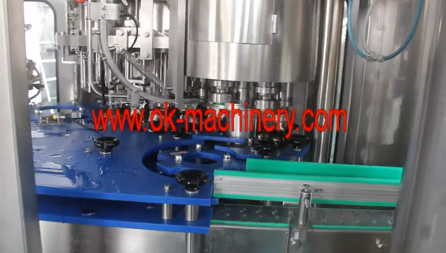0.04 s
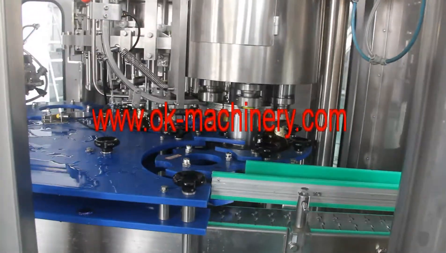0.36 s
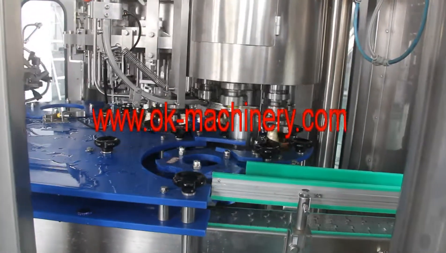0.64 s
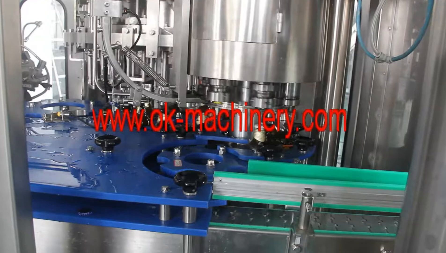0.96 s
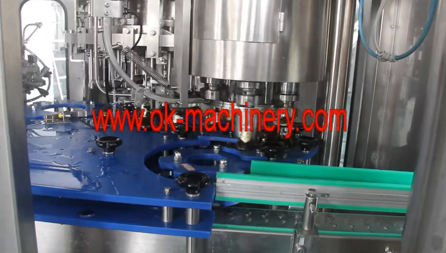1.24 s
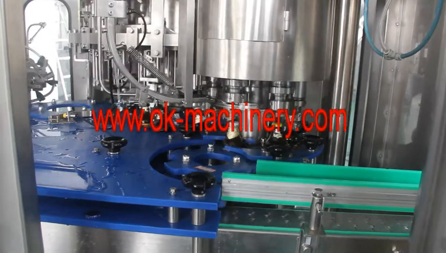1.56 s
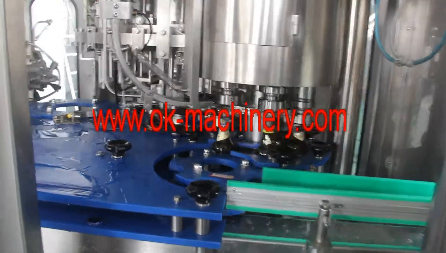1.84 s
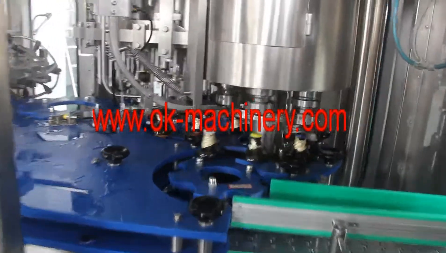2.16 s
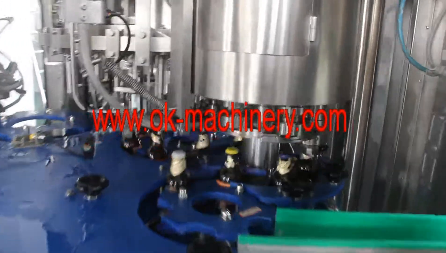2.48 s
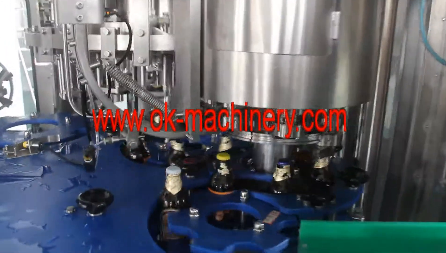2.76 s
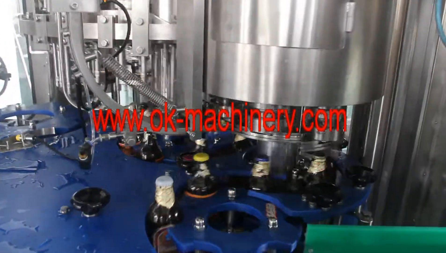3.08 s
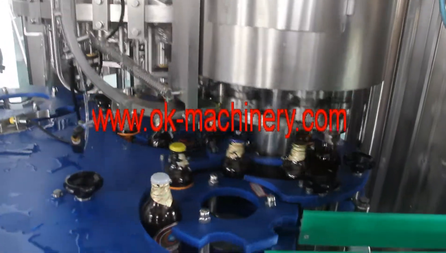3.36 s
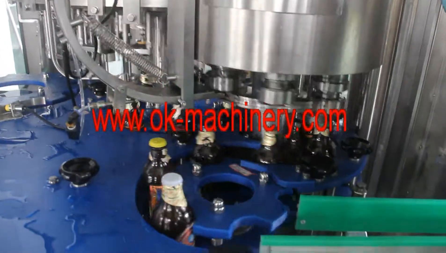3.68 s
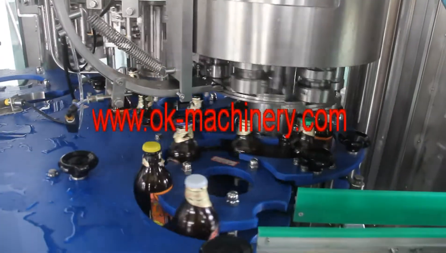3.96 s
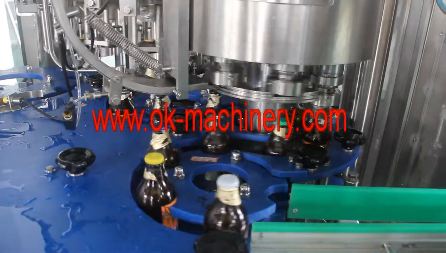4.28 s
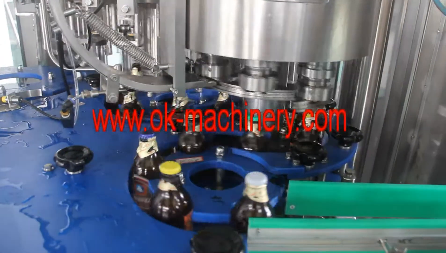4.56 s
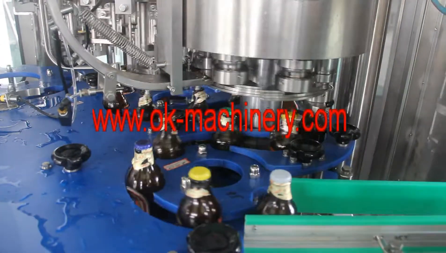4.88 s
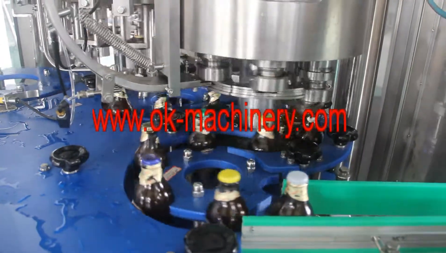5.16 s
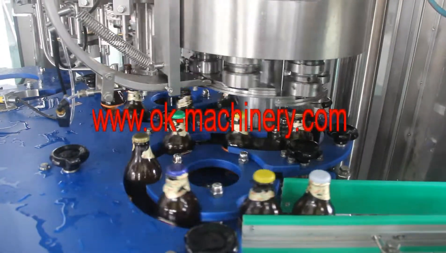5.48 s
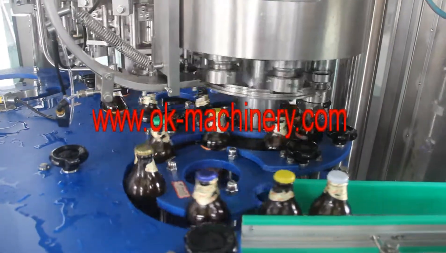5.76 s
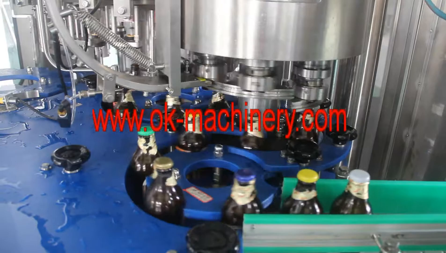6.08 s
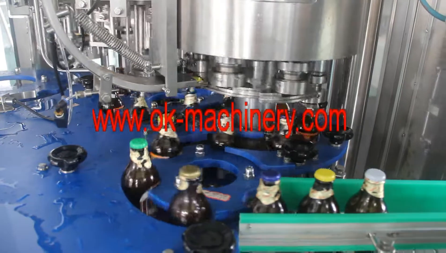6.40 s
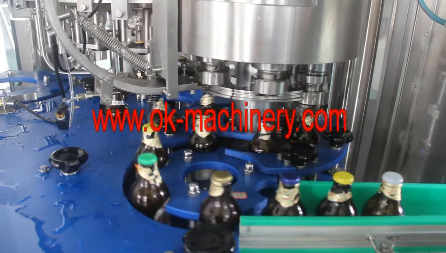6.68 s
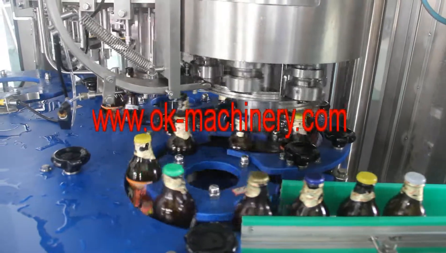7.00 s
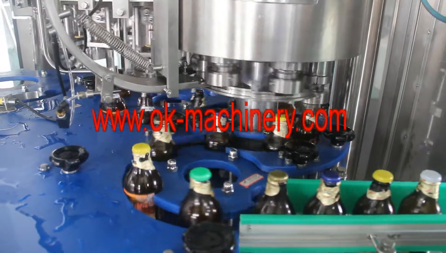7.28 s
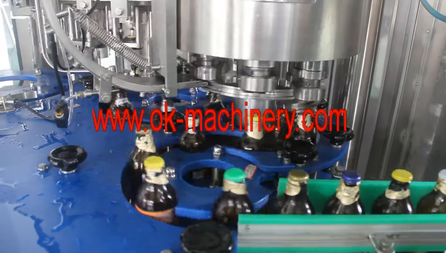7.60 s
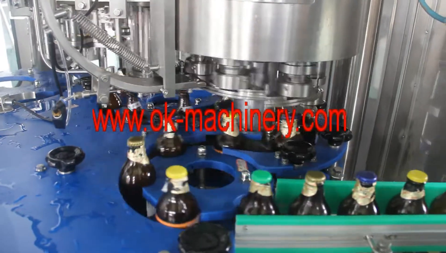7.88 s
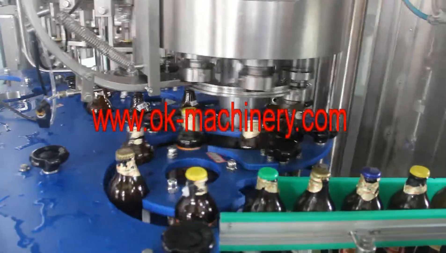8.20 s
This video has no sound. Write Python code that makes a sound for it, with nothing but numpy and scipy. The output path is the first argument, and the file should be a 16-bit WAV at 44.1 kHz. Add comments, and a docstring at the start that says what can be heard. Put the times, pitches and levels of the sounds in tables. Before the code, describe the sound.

A jet of compressed air hisses without pause inside a bottle capping machine, ringing between steel guards. A little more than once a second a passing bottle adds a brief fizz and airy, whistling surges. Conveyors roar and the drive rumbles underneath, with a few dull bumps. After about two seconds the hand-held microphone moves in through the guard door, and everything becomes louder and fuller.

```python
"""A compressed-air jet hisses without pause, 1.2 m from the microphone, inside a rotary bottle capper.
It rings the hollows between capping heads and bottles, and the steel guards echo it. Every 0.8 s a bottle
crosses the jet: a fizz, then the hollows surge in turn. Underneath, conveyors roar and the drive rumbles.
The hand-held microphone is carried up to the open guard door and leans in at 2.4 s, ending 0.75 m away."""
import sys
import numpy as np
from scipy import signal
from scipy.fft import rfft, irfft, next_fast_len
from scipy.io import wavfile
from scipy.ndimage import uniform_filter1d, minimum_filter1d, map_coordinates

SR = 44100
rng = np.random.default_rng(int(sys.argv[2]) if len(sys.argv) > 2 else 0)


def generate_wav(sig):
    """Save sig (samples, or channels by samples) to the path in sys.argv[1] as 16-bit PCM at SR."""
    pcm = np.round(np.clip(np.atleast_2d(sig).T, -1, 1) * 32767).astype(np.int16)
    wavfile.write(sys.argv[1], SR, pcm)


N = 367794
T = np.arange(N) / SR


def undb(db):
    """Decibels to gain."""
    return 10 ** (np.asarray(db) / 20)


def unit(x):
    """Scale to rms 1."""
    return x / np.std(x)


def noise(gain):
    """Turbulence of rms 1 whose spectrum is gain(Hz)."""
    size = next_fast_len(N)
    hz = np.maximum(np.arange(size // 2 + 1) * SR / size, 1)
    spectrum = rfft(rng.standard_normal(size)) * gain(hz)
    return unit(irfft(spectrum, size)[:N])


def coloured(points):
    """Turbulence with a spectrum of (Hz, dB) points."""
    corner_hz, db = np.transpose(points)
    return noise(lambda hz: undb(np.interp(np.log(hz), np.log(corner_hz), db)))


def bell(hz, centre_hz, width_hz):
    """Gain of a resonance with steep skirts."""
    return 1 / (1 + ((hz - centre_hz) / (.78 * width_hz)) ** 2)


def blown(centre_hz, width_hz):
    """A resonance driven by turbulence; its centre may move."""
    phase = 2 * np.pi * np.cumsum(centre_hz * np.ones(N)) / SR
    a, b = (noise(lambda hz: bell(hz, 0, width_hz)) for _ in range(2))
    return unit(a * np.cos(phase) + b * np.sin(phase))


def wander(rate_hz):
    """Random drift of spread 1, changing about rate_hz times a second."""
    return noise(lambda hz: 1 / (1 + (hz / rate_hz) ** 4))


def swell(at_s, spread_s):
    """A Gaussian rise and fall round one moment."""
    return np.exp(-.5 * ((T - at_s) / spread_s) ** 2)


def delayed(x, lag_s):
    """The sound after a delay that may move."""
    return map_coordinates(x, [np.arange(N) - lag_s * SR], order=2, mode="mirror")


# The microphone's way in. Each row: time in seconds, place (0 outside the guards, 1 in the doorway,
# 2 inside), distance from the jet in metres.
MIC_PATH = [(0, 0.12, 1.2), (1.2, 0.15, 1.1), (1.6, .06, 1), (2, 0.13, 0.89), (2.365, 0.11, .89),
            (2.385, 1.05, 0.784), (2.8, 1, 0.84), (3.3, 1.69, .73), (4.1, 1.92, 0.74), (8.34, 2.08, 0.75)]

def mic_place():
    """Where the microphone is at each moment, from outside to inside."""
    times, places, _ = np.transpose(MIC_PATH)
    return np.interp(T, times, places)


def by_place(db):
    """Gain at the microphone, given levels outside, in the doorway and inside."""
    return undb(np.interp(mic_place(), [0, 1, 2], db))


def by_distance():
    """The jet's sound falls off as one over the distance in metres."""
    times, _, metres = np.transpose(MIC_PATH)
    return 1 / np.interp(T, times, metres)


# The jet's direct hiss. Each row: frequency in Hz, relative level in dB.
JET_SPECTRUM = [(500, -30), (1100, -11.5), (1500, -5.5), (2050, -5), (2500, -8), (3200, 3.5), (4000, -0.5),
                (4800, 4.5), (6400, 2), (7000, 1), (9300, -2), (11300, -4.5), (12600, -9.5), (15500, -12.5)]

def jet(hiss_db=-17.0):
    """The free jet hisses broadly and flutters a little."""
    flutter_db = .25 * wander(9)
    return coloured(JET_SPECTRUM) * undb(hiss_db + flutter_db)


# One bottle crosses the jet at each step of the star wheel. Each row: time in seconds, then in dB the
# hollow's surge behind this bottle, its surge ahead of the next, and the neck's change in level.
CROSSINGS = [(0, 1.5, -7, 0), (0.786, -1, 0, 4), (1.572, 3.5, 1.5, -5), (2.36, 1, -1, -5), (3.148, 4, 3, 8),
             (3.93, 2, 3, 8), (4.715, 3.5, 3, 9.5), (5.502, 5, 6, 0), (6.285, 5, 4.5, 5),
             (7.068, 5, 3.5, 4), (7.862, 5, 5, 5)]

def each_bottle(after_s, spread_s, column=None):
    """One swell at the same point of every cycle; a column of the crossings may give its size."""
    return sum((row[column] if column else 1) * swell(row[0] + after_s, spread_s) for row in CROSSINGS)


def choke_db(block_db=-3, lead_s=0.046, spread_s=0.046, head_share=0.18, head_after_s=0.42):
    """Each arriving bottle partly blocks the jet; so, less, does the capping head half a cycle later."""
    return block_db * (each_bottle(-lead_s, spread_s) + head_share * each_bottle(head_after_s, spread_s))


def spray(level_db=-25, spread_s=0.034, centre_hz=9000, width_hz=3800):
    """Each wet bottle splits the jet into a short, brighter fizz."""
    return blown(centre_hz, width_hz) * undb(level_db) * each_bottle(0, spread_s)


# The hollow under the capping heads: level in dB at 1 m, from outside, the doorway and inside.
HOLLOW_LEVELS = [-25, -18, -24.5]

def hollow(doorway_hz=3640, inside_hz=3560, bend_hz=70, behind_s=.18, ahead_s=.53, spread_s=.08):
    """The jet rings the hollow in two surges a cycle: higher behind a bottle, lower ahead of the next."""
    bend = bend_hz * (each_bottle(behind_s, spread_s) - each_bottle(ahead_s, spread_s))
    centre_hz = np.interp(mic_place(), [1, 2], [doorway_hz, inside_hz]) + bend + 55 * wander(7)
    surge_db = each_bottle(behind_s, spread_s, column=1) + each_bottle(ahead_s, spread_s, column=2)
    ring = blown(centre_hz, width_hz=520) * by_place(HOLLOW_LEVELS)
    return ring * undb(surge_db + choke_db() + 0.95 * wander(6.3))


# The echo off the machine's table: dB against the direct sound, outside, in the doorway and inside.
TABLE_ECHO_LEVELS = [-16, -20, -33]

def echoes(air, echo_share=0.13, count=14, detour_at_1m_ms=0.2496):
    """A glancing echo off the table and later ones off guards and heads comb the hiss; the combs slide."""
    detour_s = detour_at_1m_ms * by_distance() / 1000
    combed = air + by_place(TABLE_ECHO_LEVELS) * delayed(air, detour_s)
    for lag_s in np.geomspace(.001, .016, count):
        # each path changes as the microphone moves in, and wavers with the turning parts
        path_s = lag_s * rng.uniform(.9, 1.1) + rng.uniform(-3, 3) * detour_s
        combed += echo_share * delayed(air, path_s + .00005 * wander(3.5))
    return unit(combed) * np.std(air)


# The air space between the guards: overall level in dB outside, in the doorway and inside.
CABINET_LEVELS = [-23.5, -15, -19]
# Its modes. Each row: pitch in Hz, width in Hz, relative dB outside, in the doorway and inside.
AIR_MODES = [(1400, 210, -13, -23.5, -25.5), (1930, 430, -18, -11.5, -18), (2210, 95, -1.5, -9, -2.5),
             (2368, 46, -14, -1, 0), (2501, 47, -2, 0, 2.5), (2684, 102, -15, -0.5, 0.5),
             (2920, 190, -1, -15, 0.5), (3123, 110, 5, -3, -3.5), (3446, 120, -16, -2.5, 0),
             (3745, 89, 4, -8.5, 1), (3970, 52, 9.5, 4, -6), (4140, 50, 7, -3.5, -16),
             (4396, 93, 7, -2, -10), (4890, 103, -3, -5.5, -1.5), (5340, 200, -1, -5, -2.5),
             (5560, 24, -6, -1.5, 4), (6280, 140, 1, -39, -5.5), (6500, 89, 0.5, -2.5, -18)]

def cabinet(choke_share=0.38):
    """The hiss keeps the air between the guards ringing; each mode is strong here and weak there."""
    ring = 0
    for place, level_db in enumerate(CABINET_LEVELS):
        def spectrum(hz):
            gains = (undb(db[place]) * bell(hz, pitch, width) for pitch, width, *db in AIR_MODES)
            return np.sqrt(sum(gain ** 2 for gain in gains))
        nearness = np.maximum(1 - abs(mic_place() - place), 0)
        ring += noise(spectrum) * np.sqrt(nearness) * undb(level_db)
    return ring * undb(choke_share * choke_db())


# The conveyors in the hall. Each row: frequency in Hz, relative level in dB.
CONVEYOR_SPECTRUM = [(80, -40), (200, 0), (350, 2), (800, 3), (1300, 0), (1800, 0), (2100, -24),
                     (4000, -16)]
# Their level in dB before the trim: outside, in the doorway and inside.
CONVEYOR_LEVELS = [-44, -35, -35]

def conveyors(trim_db=1.42):
    """The conveyors' roar jumps up as the microphone clears the door frame."""
    return coloured(CONVEYOR_SPECTRUM) * by_place(CONVEYOR_LEVELS) * undb(trim_db + 0.97 * wander(13.4))


# The capper's drive. Each row: frequency in Hz, relative level in dB.
DRIVE_SPECTRUM = [(20, -35), (42, -32), (70, -23), (90, 0), (130, -0.5), (185, -3.5), (270, -7), (500, -22),
                  (1500, -23.5)]
# Its rumble in dB: outside, in the doorway and inside.
DRIVE_LEVELS = [-47.5, -44, -43.5]

def drive(hum_hz=179, hum_db=-54.5):
    """The drive rumbles, louder from the doorway on, with a faint hum that is alike everywhere."""
    rumble = coloured(DRIVE_SPECTRUM) * by_place(DRIVE_LEVELS) * undb(.9 * wander(8.1))
    return rumble + blown(hum_hz, width_hz=18.0) * undb(hum_db)


# Edges in the jet. Each row: seconds after a crossing, spread in seconds, pitch in Hz, width in Hz,
# level in dB at 1 m.
EDGE_WHISTLES = [(.155, 0.037, 4520, 450, -31), (0.437, 0.067, 6540, 450, -34),
                 (.63, 0.038, 4316, 500, -26.5)]

def edges(flutter_db=2.0):
    """Edges of the turning head cut the jet: three airy whistles in every cycle."""
    return sum(blown(hz, width) * each_bottle(after, spread) * undb(db + flutter_db * wander(3))
               for after, spread, hz, width, db in EDGE_WHISTLES)


# The gap round a bottle neck: level in dB at 1 m, from outside, the doorway and inside.
NECK_LEVELS = [-24, -37, -28.5]

def neck(centre_hz=5620, after_s=.27, glide_hz_per_s=3500):
    """The gap round a neck sings, mostly louder just after a crossing, rising in pitch as it narrows."""
    times = np.array(CROSSINGS)[:, 0]
    since_crossing_s = T - times[np.maximum(np.searchsorted(times, T) - 1, 0)]
    glide_hz = glide_hz_per_s * (since_crossing_s - after_s) * each_bottle(after_s, spread_s=.1)
    surge_db = each_bottle(after_s, spread_s=0.056, column=3)
    ring = blown(centre_hz + glide_hz + 70 * wander(9), width_hz=540)
    return ring * by_place(NECK_LEVELS) * undb(surge_db + wander(12))


# Star wheel and lifters. Each row: peak time in seconds, level in dB before the trim, pitch in Hz,
# spread in seconds.
WHEEL_BUMPS = [(.4, -44, 150, 0.051), (0.6, -41.5, 226, .09), (1.97, -47, 126, 0.091),
               (2.422, -46, 103, 0.094), (2.67, -42, 175, 0.11), (4.08, -42, 298.7, .12),
               (4.34, -39, 160, 0.061), (7.334, -40, 150, .06)]

def bumps(trim_db=-1, width_hz=55):
    """The star wheel and lifters give a dull bump now and then."""
    return sum(blown(hz, width_hz) * undb(db + trim_db) * swell(at, spread)
               for at, db, hz, spread in WHEEL_BUMPS)


# Whistles heard from outside the door. Each row: peak time in seconds, spread in seconds, pitch in Hz,
# level in dB at 1 m.
STRAY_WHISTLES = [(.48, .09, 4350, -25), (1.12, 0.11, 3170, -25), (1.13, 0.052, 4350, -22),
                  (1.955, .03, 4390, -17.5)]

def squeals(width_hz=260):
    """The air gives short, louder whistles that keep no step with the bottles."""
    return sum(blown(hz, width_hz) * undb(db) * swell(at, spread) for at, spread, hz, db in STRAY_WHISTLES)


def frame_shadow(at_s=1.78, spread_s=0.26, loss_db=-3):
    """The hiss dips on the way to the door, as the frame screens the microphone from the jet."""
    return undb(loss_db * swell(at_s, spread_s))


def scene():
    """Air noise and machinery meet at one microphone, which feeds both channels."""
    air_at_1m = jet() + hollow() + neck() + edges() + squeals() + spray()
    air_at_mic = air_at_1m * by_distance() * frame_shadow()
    sound = echoes(air_at_mic) + cabinet() + conveyors() + drive() + bumps()
    return np.array([sound, sound])


def limiter(x, ceiling=0.58, hold_s=0.001):
    """The gain ducks just long enough to hold each peak under the ceiling."""
    hold = int(hold_s * SR)
    gain = ceiling / np.maximum(abs(x), ceiling)
    return x * uniform_filter1d(minimum_filter1d(gain, hold), hold)


def record(dry, low_cut_hz=52, top_hz=15750):
    """The hand-held phone limits the peaks, drops the deep bass and cuts the top."""
    low_cut = signal.butter(3, low_cut_hz, "high", fs=SR, output="sos")
    top_cut = signal.ellip(8, .05, 50, top_hz, fs=SR, output="sos")
    return signal.sosfiltfilt(top_cut, signal.sosfilt(low_cut, limiter(dry)))


dry = scene()
out = record(dry)
generate_wav(out)
```